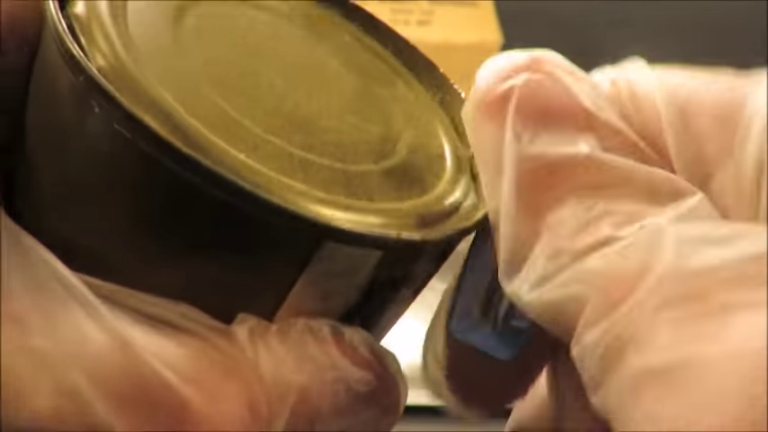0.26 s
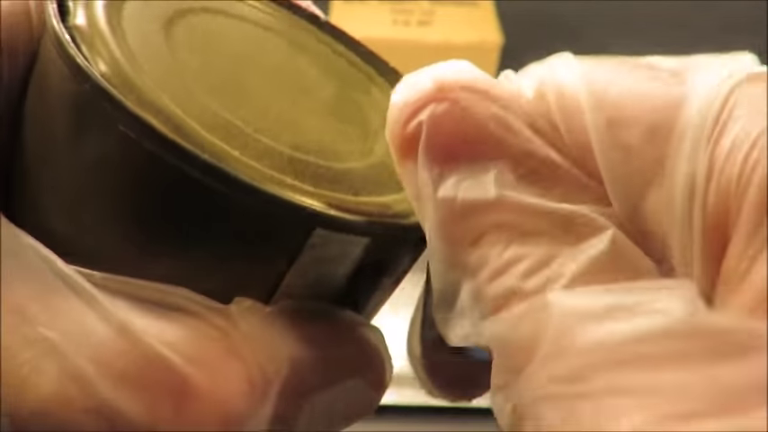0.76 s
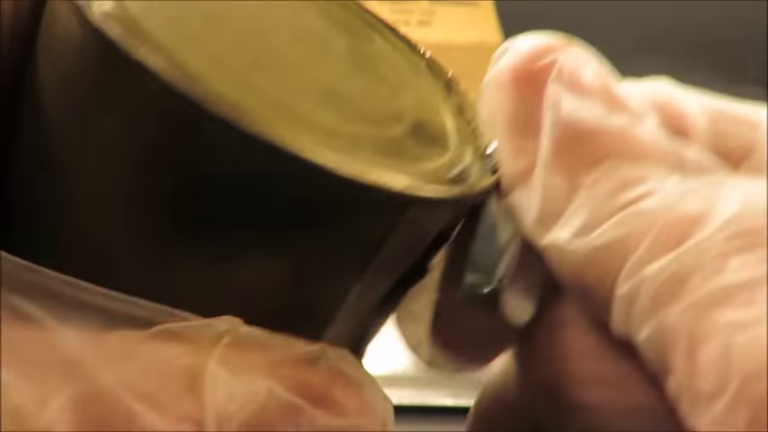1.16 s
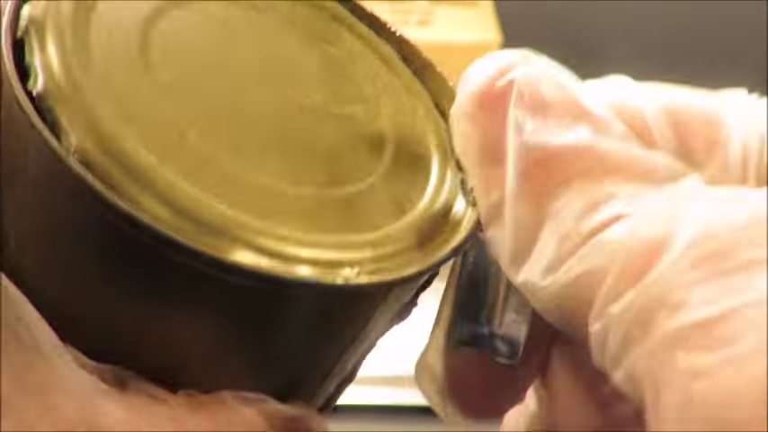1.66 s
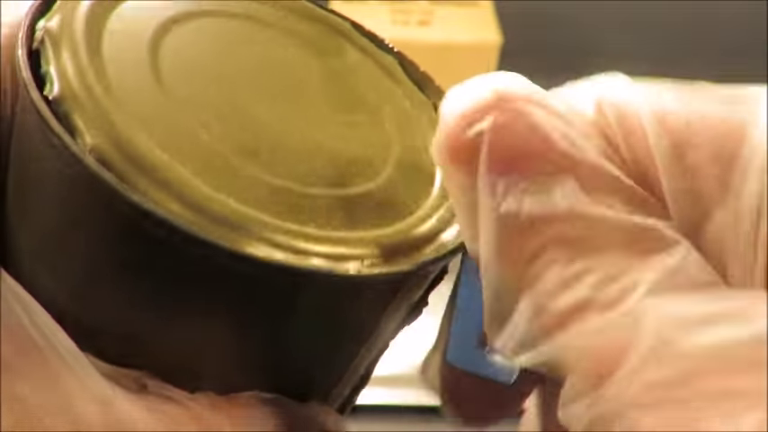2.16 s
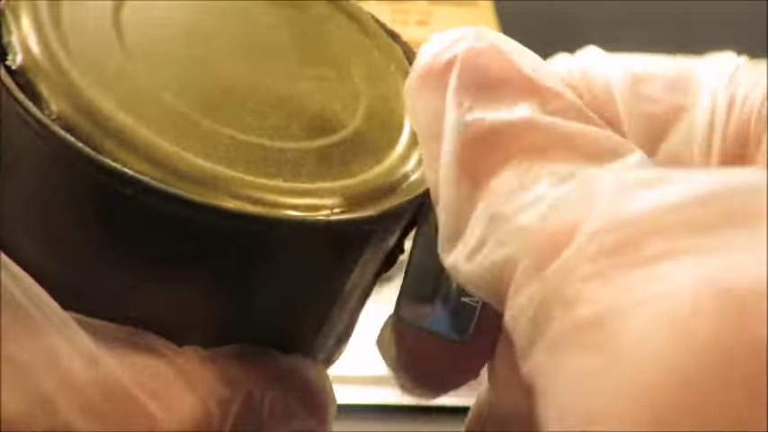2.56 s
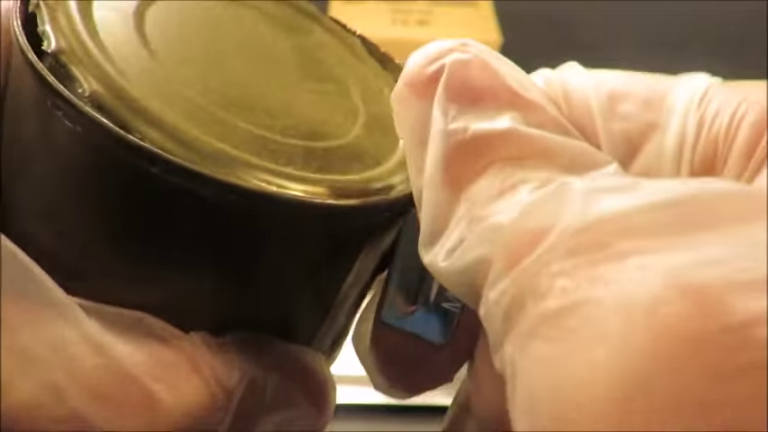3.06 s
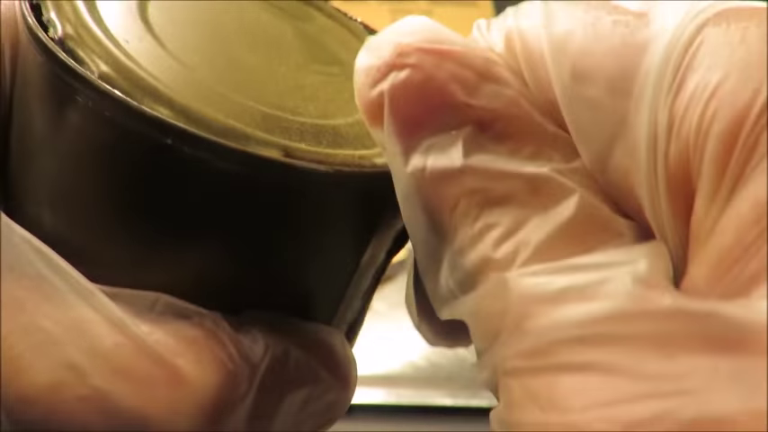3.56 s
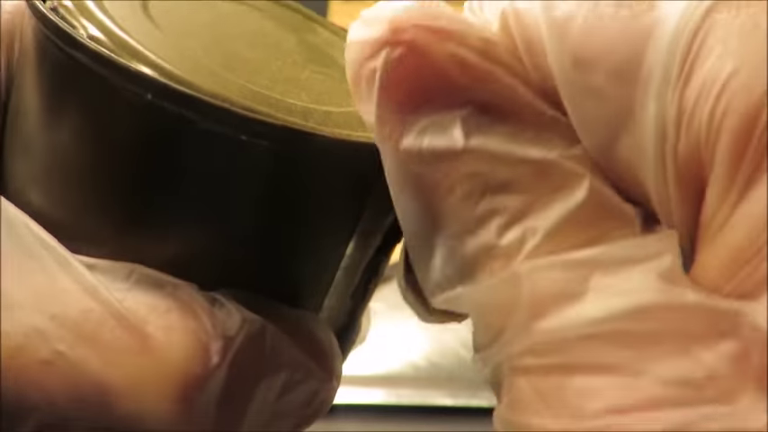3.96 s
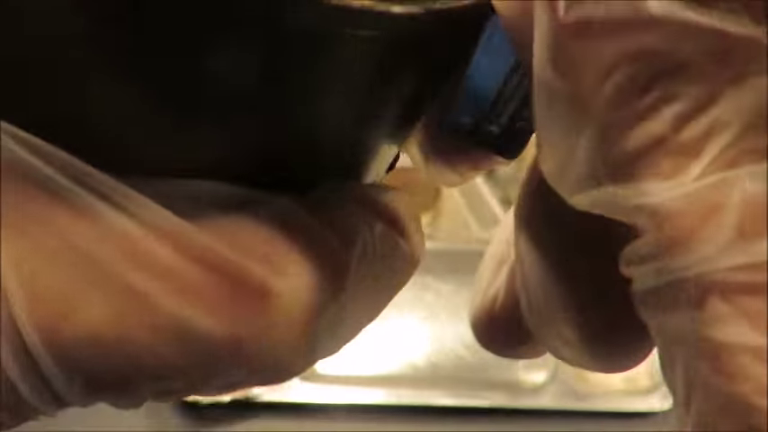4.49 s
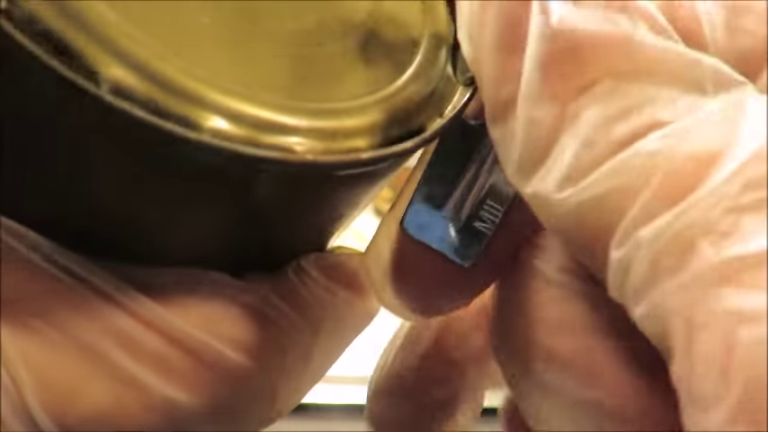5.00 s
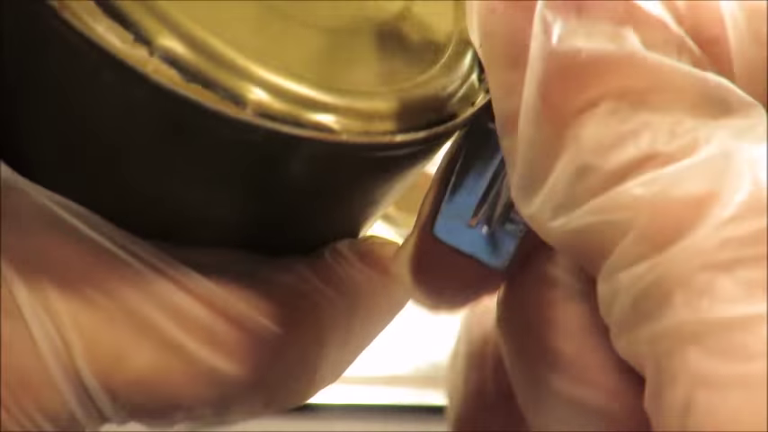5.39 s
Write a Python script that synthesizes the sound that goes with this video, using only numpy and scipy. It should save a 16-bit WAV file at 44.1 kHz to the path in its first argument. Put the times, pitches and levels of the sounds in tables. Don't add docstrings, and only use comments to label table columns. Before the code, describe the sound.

A hand-held opener levers round a tin's rim: loud snaps with short mid-pitched rings, bright steel ticks, soft thuds and rough tearing scrapes. The first bites ring tighter; after a short rustling pause the scraping becomes nearly continuous, thins out to faint touches, then returns as a busy cluster with the loudest, brightest snap. Close stereo pickup, dry small room, low hum and air that dips after loud bites.

```python
import sys
import numpy as np
from scipy import signal
from scipy.io import wavfile
from scipy.ndimage import uniform_filter1d

SR = 44100
rng = np.random.default_rng(int(sys.argv[2]) if len(sys.argv) > 2 else 0)


def voltage_ratio(level):
    return 10 ** (np.asarray(level, float) / 20)


def master(y):
    cut = np.clip(np.atleast_2d(y).T, -1, 1)
    pcm = np.round(cut * 32767)
    wavfile.write(sys.argv[1], SR, pcm.astype(np.int16))


N = 248591

# start in seconds, rise in seconds, fall in seconds,
# level in dB, bright part in dB relative to that level.
CUTS = [(0.163, 0.018, 0.024, -16, -28), (0.401, 0.017, 0.027, -29.5, -22),
        (0.504, 0.003, 0.071, -25.5, -21.5), (0.769, 0.0047, 0.12, -34, -18),
        (1.08, 0.011, 0.031, -23.5, -18.5), (1.195, 0.012, 0.014, -17, -20.5),
        (1.751, 0.0038, 0.037, -22, -18.5), (1.878, 0.0032, 0.077, -30.5, -18.5),
        (2.02, 0.0084, 0.05, -25.5, -14.5), (2.152, 0.062, 0.037, -33.5, -19),
        (2.298, 0.0066, 0.042, -20.5, -17), (2.436, 0.019, 0.041, -33, -19.5),
        (2.569, 0.038, 0.025, -26.5, -15.5), (2.71, 0.032, 0.035, -30.5, -15.5),
        (2.8, 0.08, 0.018, -32.5, -17.5), (2.967, 0.026, 0.029, -34, -15.5),
        (3.146, 0.0025, 0.02, -21, -24), (5.157, 0.0088, 0.014, -27.5, -13.5),
        (5.19, 0.042, 0.034, -32, -18), (5.358, 0.032, 0.044, -25.5, -19)]
# start in seconds, rise in seconds, fall in seconds,
# level in dB, bright part in dB relative to that level.
SLIDES = [(.001, 0.0009, 0.11, -35, -18.5), (0.257, 0.0042, 0.096, -36, -22), (1.51, 0.012, 0.23, -43, -9),
          (2.522, 0.0047, 0.02, -23, -20), (3.029, 0.022, 0.047, -38.5, -19),
          (3.574, 0.075, 0.021, -40.5, -15.5), (3.719, 0.053, 0.016, -40.5, -17),
          (3.934, 0.031, 0.029, -41, -9.5), (4.118, 0.035, 0.028, -30.5, -11.5),
          (4.631, 0.04, 0.055, -35, -11.5), (4.798, 0.051, 0.042, -39.5, -12.5),
          (5.496, 0.0079, 0.039, -39.5, -9.5), (5.542, 0.043, 0.067, -43, -10)]


def at_hz(points, hz):
    points_hz, values = np.transpose(points)
    return np.interp(np.log(hz), np.log(points_hz), values)


def rms_one(x):
    return x / np.sqrt(np.mean(x ** 2) + 1e-20)


def band(x, low_hz, high_hz):
    sos = signal.butter(2, [low_hz, min(high_hz, .45 * SR)], "band", fs=SR, output="sos")
    return signal.sosfilt(sos, x + 1e-18)


def drift(rate_hz):
    r = np.exp(-80 * np.pi * rate_hz / SR)
    noise = rng.standard_normal(N // 40 + 2002)
    slow = signal.lfilter([1], [1, -2 * r, r * r], noise)[2000:]
    return np.interp(np.arange(N) / 40, np.arange(len(slow)), rms_one(slow))


def ring(clicks, hz, width_hz):
    r = np.exp(-np.pi * width_hz / SR)
    w = 2 * np.pi * hz / SR
    return signal.lfilter([0, np.sin(w)], [1, -2 * r * np.cos(w), r * r], clicks + 1e-18)


def impulses(times, sizes):
    clicks = np.zeros(N)
    np.add.at(clicks, np.round(np.asarray(times) * SR).astype(int), sizes)
    return clicks


def grains(spread_db, per_s):
    sizes = voltage_ratio(spread_db * np.minimum(rng.exponential(1, N), 4))
    sizes = sizes * rng.choice([-1, 1], N)
    return rms_one(sizes * (rng.random(N) < per_s / SR))


def banded_noise(spectrum, patchy_db):
    # frequency in Hz, likeness from -1 to 1.
    likeness = [(60, 0.73), (180, -0.27), (550, -0.35), (1650, 0.76), (4970, 0.3), (15000, 0.6)]
    out = 0
    together = drift(4.0)
    edges_hz = 25 * 2 ** np.arange(0, 9.6, .5)
    white = rng.standard_normal((2, 2, N))
    for k, (low, high) in enumerate(zip(edges_hz, edges_hz[1:])):
        mid, side = band(white[k % 2], low, high)
        hz = np.sqrt(low * high)
        alike = np.clip(at_hz(likeness, hz), -1, 1)
        flicker_db = patchy_db * (0.26 * together + drift(22.2))
        gain = voltage_ratio(at_hz(spectrum, hz) + flicker_db)
        out = out + gain * (np.sqrt(1 + alike) * mid + np.sqrt(1 - alike) * side * [[1], [-1]])
    return out / np.sqrt(np.mean(band(out.mean(axis=0), 200, 16000) ** 2))


def contacts():
    # time in seconds, peak in dB, best excited pitch in Hz,
    # bright tick in dB relative to the peak, free ring in dB relative to the peak.
    bites_tight = [(.1665, -11, 1950, -15.5, 3.5), (.175, -6.5, 1130, -20, 7), (.187, -2, 1180, -13.5, -15),
                   (.408, -18, 1430, -32, 0.5), (.418, -13, 1040, -24.5, -7.5),
                   (.508, -22, 1040, -11.5, 0.5), (.561, -17, 870, -22.5, -6),
                   (.604, -14, 1060, -28.5, -8.5), (.6675, -5, 1950, -17, 5), (.6715, -0.5, 1040, -17, -5),
                   (.6762, -15.5, 1560, -20, -1), (.778, -29.5, 1040, -12, 7), (.968, -6, 1356, -20, -12),
                   (1.089, -18, 900, -13, 4), (1.111, -12.5, 854, -23, -12), (1.202, -12, 1120, -13.5, 3.5),
                   (1.209, -20, 1020, -13, 11.5), (1.212, -17.5, 2480, -23, 8)]
    bites_cut = [(1.528, -24, 1260, -7.5, 1), (1.693, -18, 2130, -18.5, -7.5),
                 (1.745, -0.5, 1160, -15, -6.5), (1.747, -13.5, 1780, -43, -2), (1.763, -25, 1430, -21, -4),
                 (1.774, -11.5, 1010, -29, -28), (2.025, -11.5, 2500, -21.5, -5),
                 (2.513, -11, 2534, -17, -2), (2.591, -10.5, 1800, -31, -18), (2.871, -9.5, 1284, -32, -3),
                 (3.052, -12.5, 1390, -20, -8.5), (3.15, -15.5, 1240, -10.5, -22),
                 (3.17, -12.5, 1930, -21.5, -15.5)]
    bites_loose = [(3.961, -22, 2980, -27.5, -3), (4.164, -14, 2580, -19, -7.5), (4.628, -9.5, 1240, -9, 3),
                   (4.759, -13.5, 2480, -21.5, -1.5), (4.806, -20, 1370, -10, 6),
                   (4.834, -10, 2095, -14.5, -4.5), (5.0222, -8.5, 840, -32, -2.5),
                   (5.0243, -12.5, 2640, -20.5, 5), (5.028, -6.5, 1600, -19, -3.5),
                   (5.302, -12.5, 2800, -14.5, -6.5), (5.37, -10.5, 1200, -25, -9),
                   (5.408, -8, 2080, -24, -23), (5.431, 1.5, 2480, -16.5, -8.5)]
    # time in seconds, peak in dB, best pitch in Hz.
    light_taps = [(.058, -22, 1090), (.153, -26.5, 866), (.262, -21, 1550), (.275, -22.5, 1040),
                  (.309, -27, 1090), (0.517, -28, 1040), (.786, -31, 1040), (.833, -28.5, 1200),
                  (.841, -23.5, 1180), (1.0793, -26, 2500), (1.253, -31, 1520), (1.538, -26.5, 1360),
                  (1.836, -23, 1040), (1.885, -31, 1560), (2.136, -26.5, 2410), (2.301, -23, 1320),
                  (2.414, -30, 2480), (2.809, -26, 1860), (2.835, -16, 1610), (3.283, -27, 1390),
                  (3.644, -27, 2730), (3.72, -24.5, 2500), (3.767, -29, 840), (4.51, -32, 1960),
                  (4.562, -32.5, 805), (4.61, -35, 2580), (4.852, -23.5, 1350), (5.161, -27, 1280),
                  (5.224, -17.5, 2720), (5.439, -23, 2000), (5.498, -28, 1290), (5.512, -28, 2320),
                  (5.514, -35, 3480)]
    # time in seconds, peak in dB.
    hinge_ticks = [(1.272, -28.5), (1.282, -24), (1.357, -24.5), (1.365, -25), (1.383, -19), (1.389, -30),
                   (1.403, -44), (1.458, -32.5), (1.525, -34), (2.215, -36), (2.795, -37), (2.85, -43),
                   (3.046, -42), (3.488, -41), (3.732, -34.5), (4.064, -43.5), (4.116, -39), (4.152, -23)]
    # time in seconds, peak in dB, best pitch in Hz.
    slips_early = [(0.0148, -28.5, 1110), (0.0256, -26, 1110), (0.0396, -25.5, 1080), (0.0701, -39, 2400),
                   (0.2228, -37, 1110), (0.5286, -21.5, 1040), (0.54, -33, 1510), (0.5475, -45, 1560),
                   (0.5655, -27, 1560), (0.573, -40, 1810), (0.596, -30, 1610), (0.704, -32, 1030),
                   (0.7944, -24.5, 1090), (0.8031, -29, 990), (0.8547, -31, 1950), (0.9828, -37, 1410),
                   (1.0959, -11.5, 1350), (1.1282, -39, 860), (1.5088, -28.5, 1020), (1.5227, -27, 930),
                   (1.7604, -17, 1430), (1.7915, -26.5, 1240), (1.8445, -32, 1040), (1.8948, -35, 1450),
                   (1.904, -29, 2140), (1.924, -31, 1370), (1.94, -25.5, 970), (2.038, -16.5, 1160),
                   (2.048, -17.5, 1500), (2.0686, -30.5, 920), (2.076, -30, 1990), (2.1323, -29, 1300),
                   (2.164, -41, 1390), (2.1737, -24.5, 1410), (2.1807, -33, 1070), (2.1881, -22.5, 1390),
                   (2.199, -33, 1420), (2.2065, -34, 930), (2.2194, -29, 1340), (2.2258, -34, 1370),
                   (2.3225, -16, 1220), (2.333, -35, 1320), (2.3412, -44, 1850), (2.4436, -28, 1310),
                   (2.4527, -25.5, 1880), (2.468, -35, 1390), (2.4717, -25, 1340), (2.4777, -35, 1330),
                   (2.5292, -24, 1270), (2.54, -26, 1280), (2.5722, -28, 1670), (2.5793, -25, 2000),
                   (2.5983, -17, 1280), (2.6075, -23, 1880), (2.6197, -23, 970)]
    # time in seconds, peak in dB, best pitch in Hz.
    slips_late = [(2.7233, -27.5, 1670), (2.7321, -31, 1040), (2.7406, -25.5, 1560), (2.7528, -25, 1270),
                  (2.825, -29, 1140), (2.85, -40, 2170), (2.864, -25, 1910), (2.888, -33, 915),
                  (2.9774, -28, 2560), (2.984, -28, 1320), (2.9914, -28, 1350), (2.9975, -40, 1370),
                  (3.0434, -40, 1280), (3.076, -35, 1360), (3.1566, -41, 1290), (3.174, -44, 1040),
                  (3.6195, -35, 1280), (3.6295, -30.5, 1200), (3.734, -38, 1220), (3.9474, -30.5, 1300),
                  (3.967, -28, 1240), (4.1162, -32, 2760), (4.128, -34, 2710), (4.136, -35, 2360),
                  (4.6437, -31, 1140), (4.6558, -30, 1980), (4.666, -30, 2090), (4.6734, -25, 1290),
                  (4.6845, -28, 1220), (4.6938, -27, 1360), (5.005, -37, 1270), (5.0454, -52, 1860),
                  (5.1937, -30.5, 1680), (5.199, -32, 1870), (5.2034, -24, 2250), (5.2195, -19, 1120),
                  (5.2536, -41, 1910), (5.3547, -30, 1280), (5.3616, -29, 1290), (5.3788, -21, 2160),
                  (5.3883, -24, 2210), (5.3937, -30, 2190), (5.4014, -21, 1400), (5.419, -26, 1080)]
    taps = [(s, db, hz, -25.5, -2.5) for s, db, hz in light_taps]
    ticks = [(s, db, 1880, -4.5, -13) for s, db in hinge_ticks]
    slips = [(s, db, hz, -54, -0.5) for s, db, hz in slips_early + slips_late]
    return bites_tight + bites_cut + bites_loose + taps + ticks + slips


def strokes(rows, follows):
    rise_db, fall_db, roundness = 8, 20, 1.17
    t, out = np.arange(N) / SR, np.zeros(N)
    for s, rise_s, fall_s, level_db in rows:
        now = slice(round(max(s, 0) * SR), round((s + rise_s + fall_s) * SR))
        since_top = t[now] - s - rise_s
        rising_db = rise_db * abs(since_top / rise_s) ** roundness
        falling_db = fall_db * abs(since_top / fall_s) ** roundness
        loss_db = np.where(since_top < 0, rising_db, falling_db)
        out[now] = np.maximum(out[now], voltage_ratio(level_db - follows * loss_db))
    return uniform_filter1d(out, size=130)


def tin():
    # pitch in Hz, width in Hz, level in dB.
    modes_tight = [(905, 200, -13), (1040, 46, -2), (1180, 210, -10.5), (1520, 74, -4.5), (1610, 150, -7.5),
                   (1937, 170, -4.5), (2480, 31, -6), (2830, 36, -26), (3365, 53, -19)]
    modes_cut = [(880, 164, -1.5), (1010, 88, 0.5), (1240, 65, 0.5), (1390, 164, 3.5), (1768, 57, -3),
                 (1930, 93, -1.5), (2160, 67, -10.5), (2456, 75, 1.5), (2802, 37, -2), (3480, 54, -9)]
    modes_loose = [(565, 270, -5.5), (970, 270, 2.5), (1280, 133, 3.5), (1600, 350, -3.5), (1950, 93, 3),
                   (2336, 240, 3), (2746, 62, 3), (3480, 60, -6)]
    stage_ends_s = [1.33, 3.4]
    scrape_focus_db_per_oct = 3.0
    s, peak_db, best_hz, _, free_db = np.transpose(contacts())
    chance = rng.standard_normal((len(s), 10))
    slip_on_s = rng.uniform(0.00073, 0.00459, len(s))
    t = np.arange(N) / SR
    stage = np.searchsorted(stage_ends_s, s)
    stage_now = np.searchsorted(stage_ends_s, t)
    drag = strokes([row[:4] for row in CUTS + SLIDES], follows=1) * voltage_ratio(2.2 * drift(90))
    order = np.argsort(s)
    scrape_hz = np.exp(np.interp(t, s[order], np.log(best_hz[order])))
    torn = [grains(spread_db=1.5, per_s=1500) for _ in range(3)]
    out = voltage_ratio(-11.0) * rms_one(band(torn[0], 660, 2420)) * drag
    for now, modes in enumerate([modes_tight, modes_cut, modes_loose]):
        hz, width_hz, level_db = np.transpose(modes)
        height = voltage_ratio(level_db) * np.sqrt(width_hz / 100)
        octaves_off = abs(np.log2(hz / best_hz[:, None]))
        share = height * voltage_ratio(-11.0 * octaves_off + 2.5 * chance[:, :len(hz)])
        share = share / np.sqrt((share ** 2).sum(axis=1, keepdims=True))
        power = np.sum(height ** 2 * SR / (4 * np.pi * width_hz))
        for k in range(len(hz)):
            size = voltage_ratio(peak_db + free_db) * share[:, k] * (stage == now)
            blows = impulses(s, .85 * size) + impulses(s + slip_on_s, .35 * size)
            focus_db = 3.5 - scrape_focus_db_per_oct * abs(np.log2(hz[k] / scrape_hz))
            wander = voltage_ratio(1.25 * drift(2.5) + focus_db)
            slips = torn[k % 3] * drag * wander * (stage_now == now) * height[k] / np.sqrt(power)
            out += (-1) ** k * ring(blows + voltage_ratio(-6.0) * slips, hz[k], width_hz[k])
    return out


def knock():
    t, out = np.arange(600) / SR, np.zeros(N + 600)
    blows = contacts()
    others_hz = np.array([758, 1347, 1790, 2500]) * 2 ** rng.uniform(-0.3, 0.21, (len(blows), 4))
    shape = np.exp(-t / 0.0021) * (1 - np.exp(-t / 0.00062))
    for (s, peak_db, best_hz, *_), hz in zip(blows, others_hz):
        partials = np.sin(2 * np.pi * best_hz * t)
        partials = partials + 0.5 * np.sin(2 * np.pi * hz[:, None] * t).sum(axis=0)
        at = round(s * SR)
        out[at:at + 600] += voltage_ratio(peak_db - 6.0) * partials * shape
    return out[:N]


def pings():
    # time in seconds, peak in dB, pitch in Hz, width in Hz.
    free_modes = [
        (0.508, -25, 1042, 12.7),
        (.512, -27, 1506, 14),
        (.512, -30, 2480, 15),
        (0.777, -24.5, 1051, 15.4),
        (5.306, -42, 1950, 11),
        (5.362, -34.5, 2764, 18),
        (5.514, -46, 3480, 14),
    ]
    return sum(ring(impulses([at], voltage_ratio(level_db)), hz, width_hz)
               for at, level_db, hz, width_hz in free_modes)


def blade():
    # pitch in Hz, width in Hz, level in dB.
    steel_modes = [(4680, 200, 3.5), (5540, 61, 2), (6160, 34, -5), (7010, 190, 3), (8880, 31, -3),
                   (11300, 29, -0.5), (13600, 220, -11)]
    s, peak_db, _, tick_db = np.transpose(contacts())[:4]
    chance = rng.standard_normal((len(s), 3, len(steel_modes)))
    bright_rows = [(*row[:3], row[3] + row[4]) for row in CUTS + SLIDES]
    hiss = strokes(bright_rows, follows=0.87) * grains(spread_db=-4.5, per_s=6600)
    hiss = hiss * voltage_ratio(2.2 * drift(150))
    fade = np.exp(-1 / (0.0022 * SR))
    ticks = impulses(s, voltage_ratio(peak_db + tick_db))
    splutter = signal.lfilter([1], [1, -fade], ticks)
    force = splutter * rng.standard_normal(N) + voltage_ratio(7.5) * ticks
    wide = band(voltage_ratio(-1.0) * force + voltage_ratio(-3.5) * hiss, 1270, 12700)
    out = wide + voltage_ratio(-5.5) * np.gradient(wide) * [[1], [-1]]
    for k, (hz, width_hz, level_db) in enumerate(steel_modes):
        rubbed = voltage_ratio(-28.0 + 4.0 * drift(8.0)) * hiss
        for ear in range(2):
            chance_db = 3.9 * chance[:, 2, k] + 1.2 * chance[:, ear, k]
            blows = impulses(s, voltage_ratio(peak_db + tick_db + chance_db - 9.0))
            out[ear] += voltage_ratio(level_db) * ring(blows + rubbed, hz, width_hz + 200)
    return out


def thump():
    # time in seconds, peak in dB, pitch in Hz, width in Hz.
    squeezes = [(0.181, -28.5, 248, 44), (0.512, -34, 201, 20), (0.969, -46, 310, 170),
                (1.203, -35.5, 222, 18), (1.282, -26.5, 348, 260), (2.534, -38, 144, 46),
                (3.052, -37, 123, 24), (4.157, -43, 124, 19), (5.032, -20, 576, 50),
                (5.157, -38.5, 130, 8.9), (5.391, -26, 572, 21), (5.411, -28, 298, 72),
                (5.424, -35.5, 255, 27), (5.435, -37, 220, 13.3), (0.773, -48, 197, 16),
                (0.059, -41, 223, 24), (.67, -27.5, 396, 53)]
    s, peak_db = np.transpose(contacts())[:2]
    push = impulses(s, voltage_ratio(0.69 * peak_db - 33.0))
    groans = sum(ring(impulses([at], voltage_ratio(level_db)), hz, width_hz)
                 for at, level_db, hz, width_hz in squeezes)
    soft = signal.sosfilt(signal.butter(2, 700, fs=SR, output="sos"), groans)
    return band(ring(push, 297, 107) + voltage_ratio(9.0) * ring(push, 523, 213), 136, 1060) + soft


def glove():
    # start in seconds, rise in seconds, fall in seconds, level in dB.
    rubs = [
        (1.225, 0.049, .2, -49.5),
        (1.33, 0.077, 0.11, -46.5),
        (1.47, 0.11, 0.17, -59),
        (3.2, 0.25, 0.05, -75),
        (3.7, .3, .3, -74),
        (4.05, 0.21, 0.11, -68.5),
        (4.5, .12, 0.0092, -60),
        (4.88, 0.1, 0.2, -66),
    ]
    # frequency in Hz, level per Hz in dB.
    rustle_colour = [(290, -29), (500, -20), (784, -28), (1030, 14), (2360, -2.5), (2540, 2.5),
                     (11300, -0.5), (16000, -1.5)]
    specks = abs(grains(spread_db=-4.5, per_s=250))
    crackle = 1 + voltage_ratio(-10.5) * uniform_filter1d(specks, size=30) * 5.0
    gain = strokes(rubs, follows=0.88) * voltage_ratio(2.0 + 3.2 * drift(150))
    return crackle * gain * banded_noise(rustle_colour, patchy_db=0.6)


def room(x):
    t60_s = 0.18
    t = np.arange(SR // 5) / SR
    tail = rng.standard_normal((2, len(t))) * voltage_ratio(-60 * t / t60_s) * (t > .003)
    tail = tail / np.sqrt((tail ** 2).sum(axis=1, keepdims=True))
    return signal.fftconvolve(x[None], tail, axes=1)[:, :N]


def ducking():
    duck_from_db, duck_share, recover_db_per_s, attack_s = -9, 1.18, 30, 0.085
    s, peak_db, _, _, free_db = np.transpose(contacts())
    t, over_db = np.arange(N) / SR, np.zeros(N)
    loud_db = peak_db + np.maximum(free_db, 0)
    over_db[(s * SR).astype(int)] = duck_share * np.maximum(loud_db - duck_from_db, 0)
    recovery_db = recover_db_per_s * t
    held_db = np.maximum.accumulate(over_db + recovery_db) - recovery_db
    r = np.exp(-1 / (attack_s * SR))
    return -signal.lfilter([1 - r], [1, -r], held_db)


def air():
    # frequency in Hz, level per Hz in dB.
    air_colour = [(88, -48), (150, -11.5), (254, -5), (466, -3), (534, -2), (601, -6), (3840, -20),
                  (12900, -39), (15100, -35), (16000, -74)]
    # time in seconds, level in dB.
    rumble_level = [
        (0.0, -64.5),
        (0.82, -70.5),
        (1.44, -60),
        (1.88, -67),
        (2.56, -59.5),
        (5.35, -60),
        (5.64, -63),
    ]
    t = np.arange(N) / SR
    hum = voltage_ratio(1 + 3.5 * drift(2.2)) * np.sin(2 * np.pi * 120.9 * t + 0.21 * drift(2.1))
    deep = rms_one(ring(rng.standard_normal(N), 53.6, 31))
    deep = deep + voltage_ratio(-2.5) * rms_one(band(rng.standard_normal((2, N)), 89, 182))
    low = voltage_ratio(np.interp(t, *np.transpose(rumble_level))) * (hum + voltage_ratio(2.0) * deep)
    return voltage_ratio(-52.5 + ducking()) * banded_noise(air_colour, patchy_db=3.0) + low


def scene():
    body = tin() + knock() + pings()
    steel, jolt = blade(), thump()
    wet = voltage_ratio(-18.0) * room(body) + voltage_ratio(-17.0) * room(steel.mean(axis=0))
    out = body * voltage_ratio([[.3], [-.3]]) + voltage_ratio(-7.0) * np.gradient(body) * [[1], [-1]]
    out = out + steel * voltage_ratio([[.4], [-.4]]) + jolt * voltage_ratio([[2.5], [-2.5]])
    return out + wet + glove() + air()


def low_pass(x):
    return signal.sosfilt(signal.butter(12, 16990, fs=SR, output="sos"), x)


def record(dry):
    top = signal.cheby1(6, 1, 15100, fs=SR, output="sos")
    mix = signal.sosfilt(top, 0.92 * np.tanh(dry))
    return low_pass(mix)


dry = scene()
out = record(dry)
master(out)
```